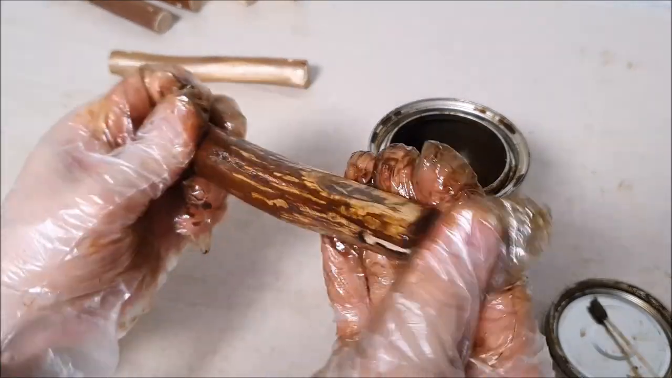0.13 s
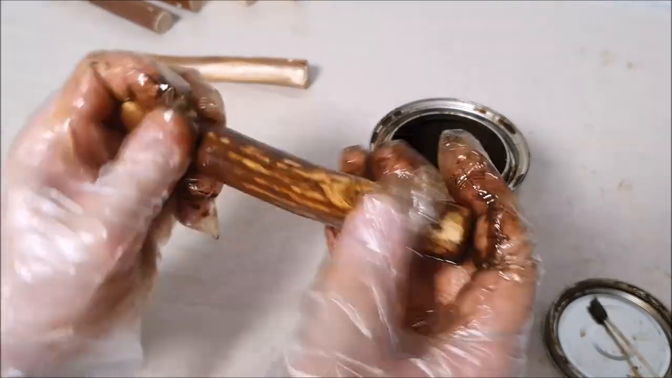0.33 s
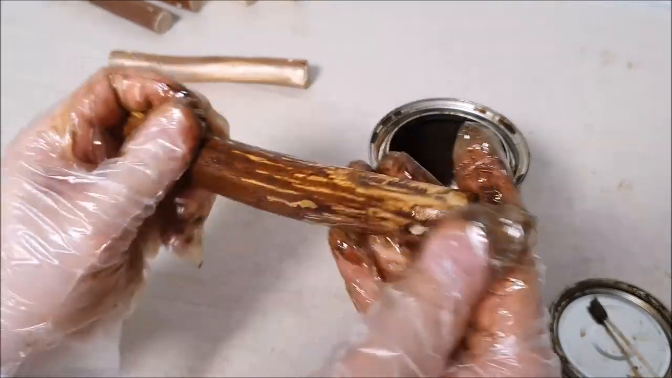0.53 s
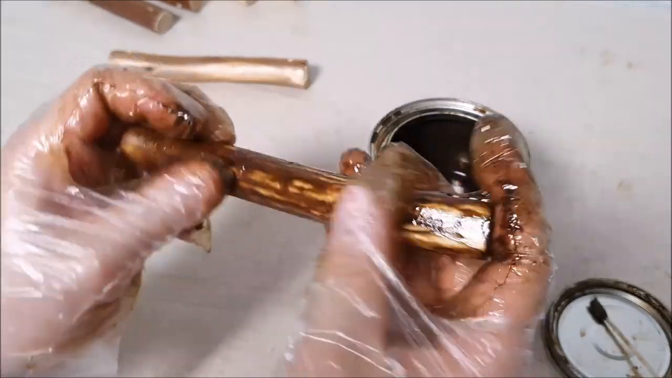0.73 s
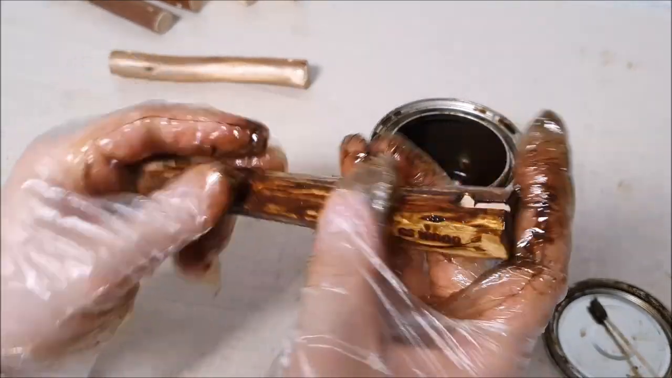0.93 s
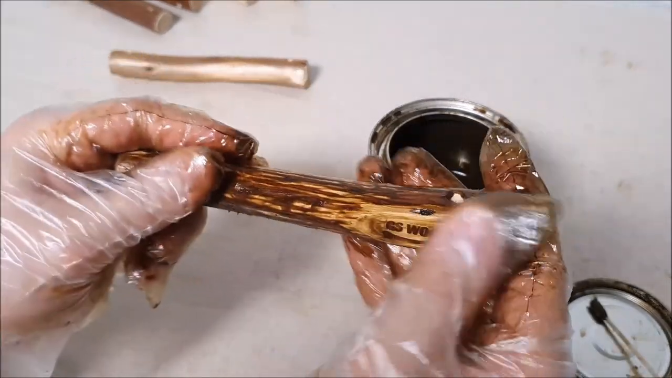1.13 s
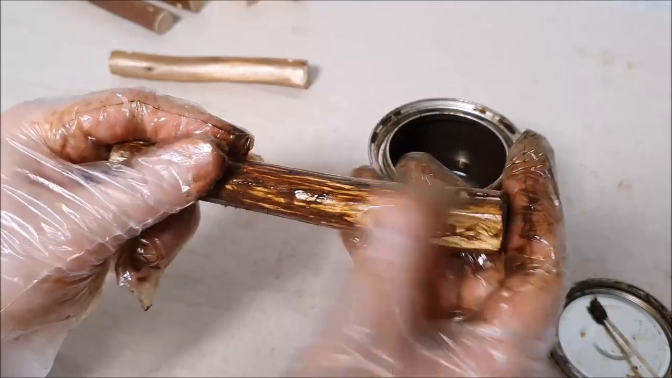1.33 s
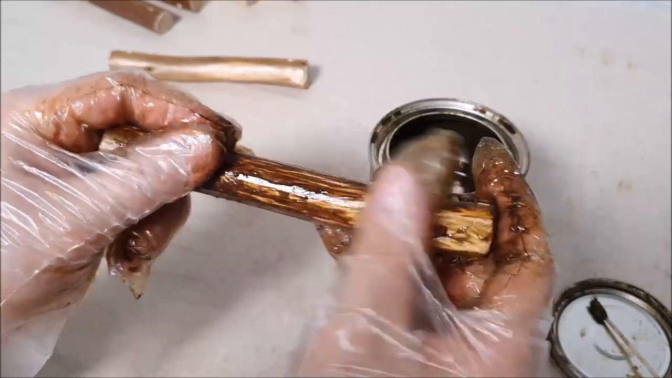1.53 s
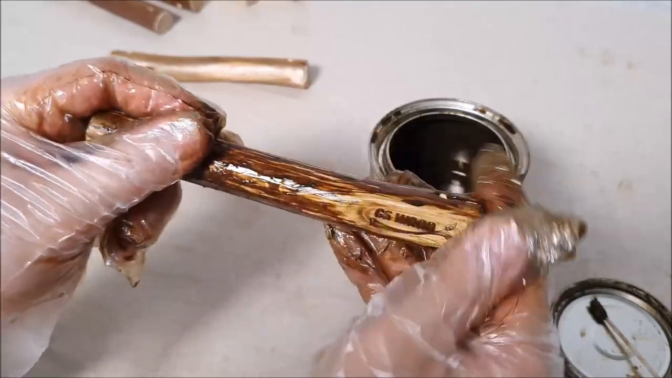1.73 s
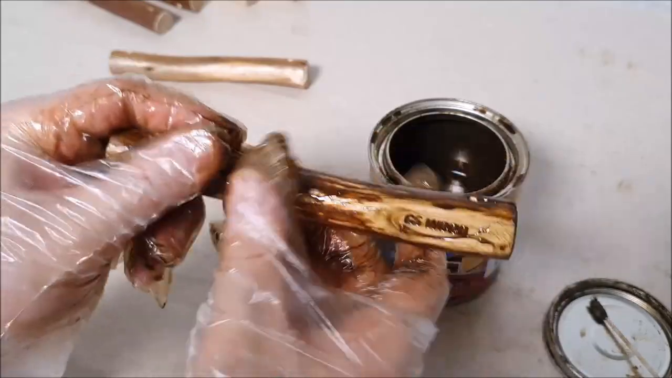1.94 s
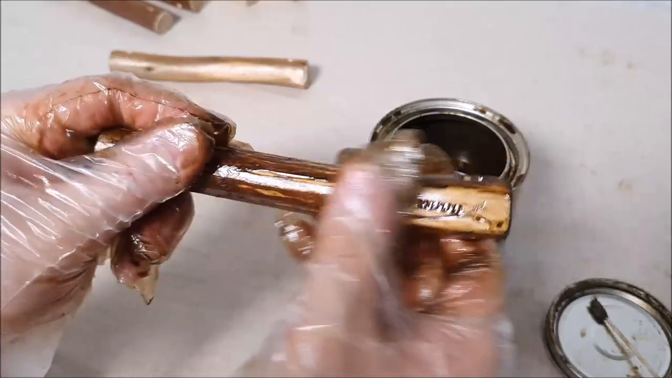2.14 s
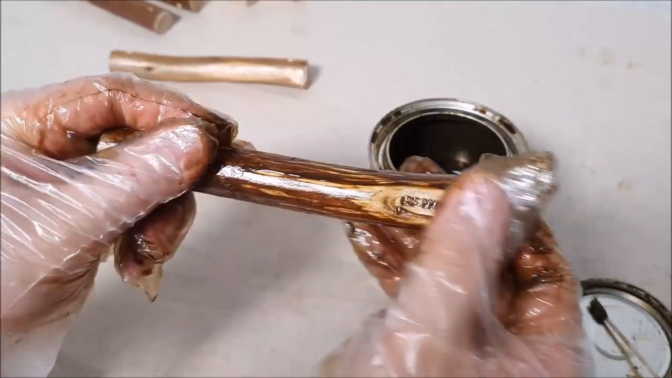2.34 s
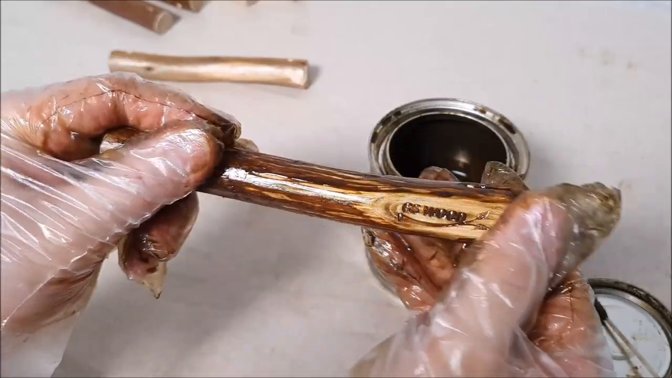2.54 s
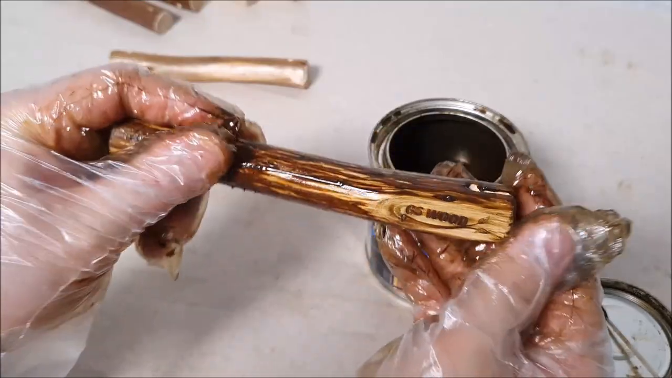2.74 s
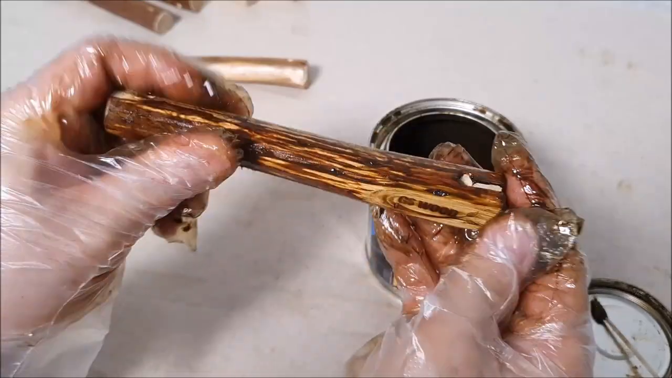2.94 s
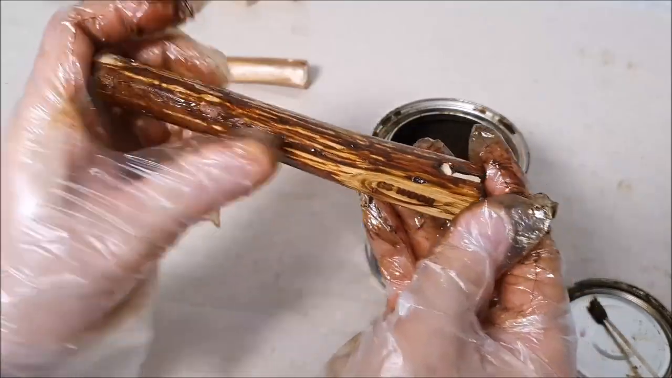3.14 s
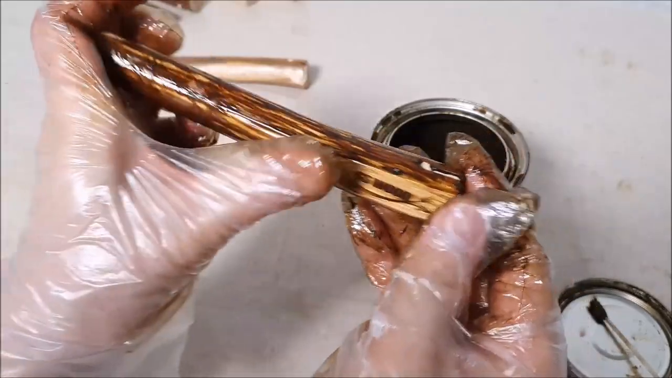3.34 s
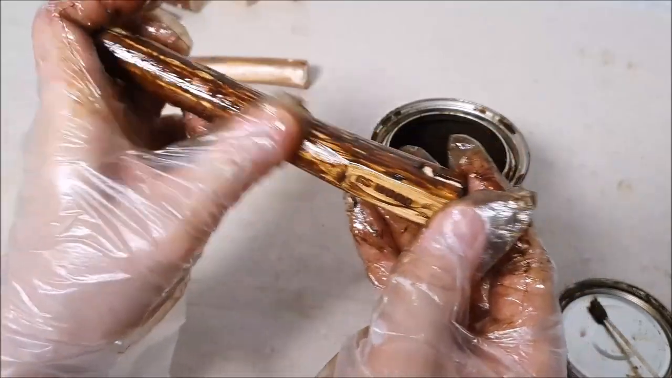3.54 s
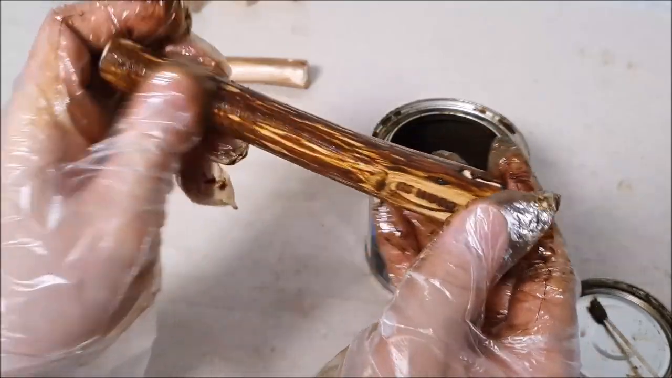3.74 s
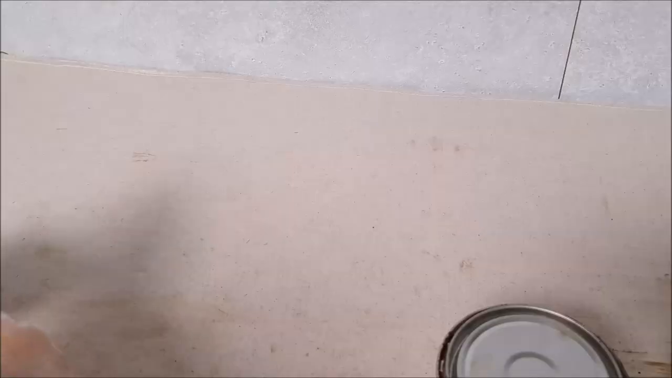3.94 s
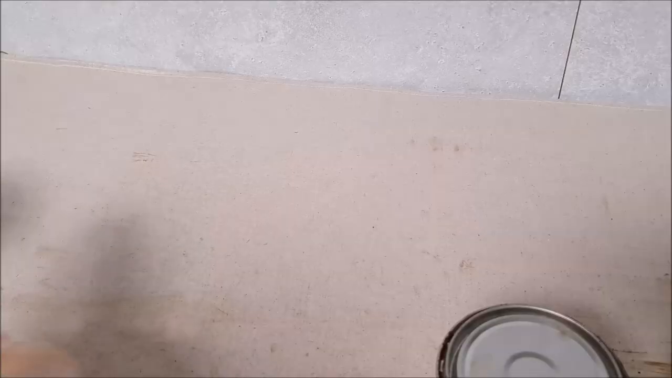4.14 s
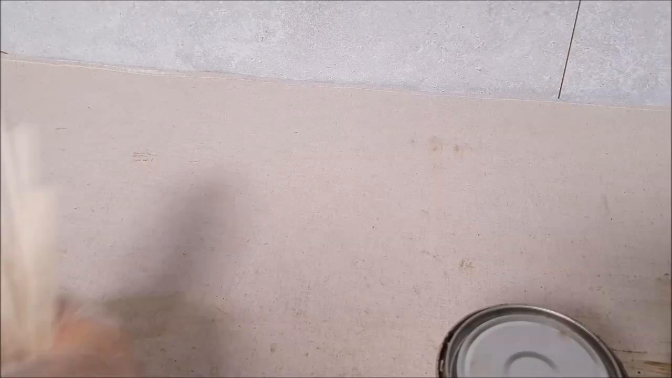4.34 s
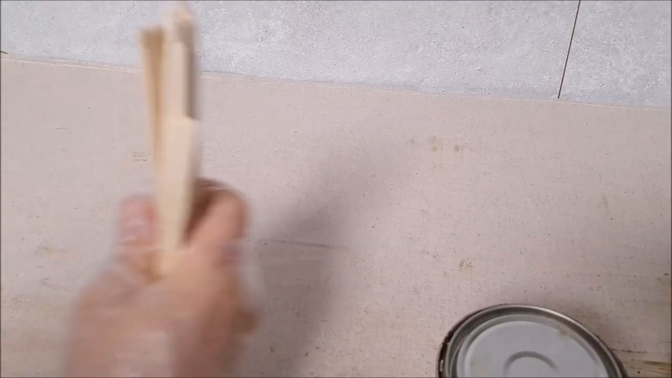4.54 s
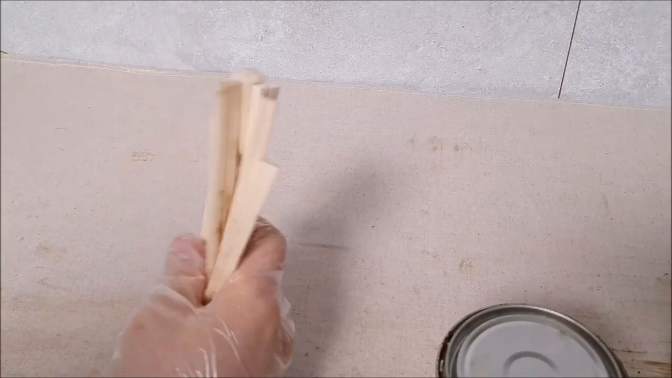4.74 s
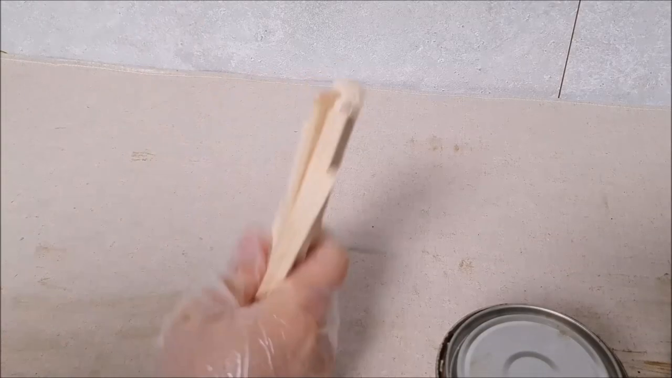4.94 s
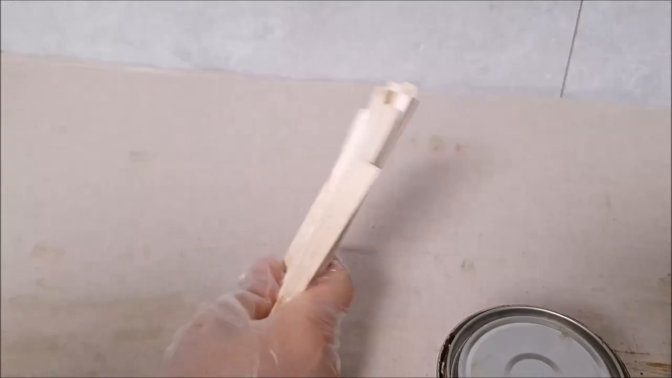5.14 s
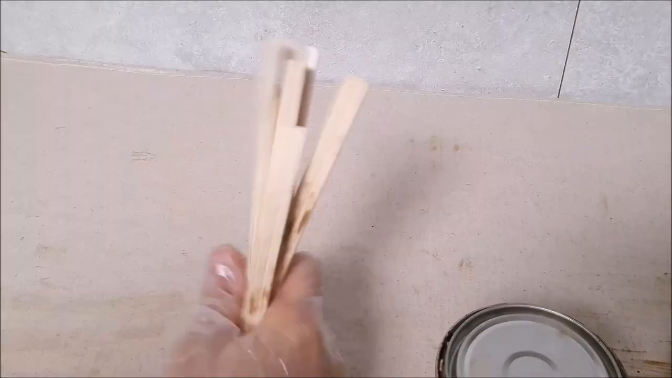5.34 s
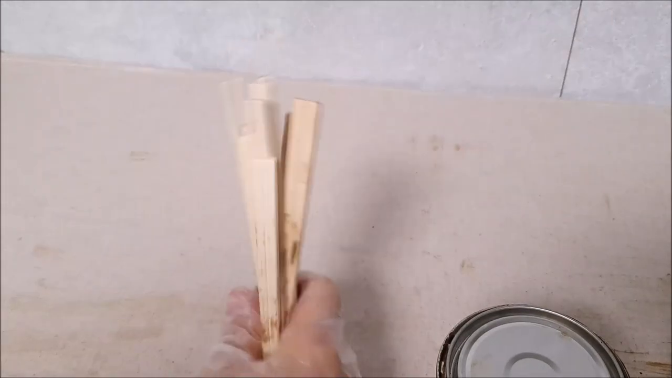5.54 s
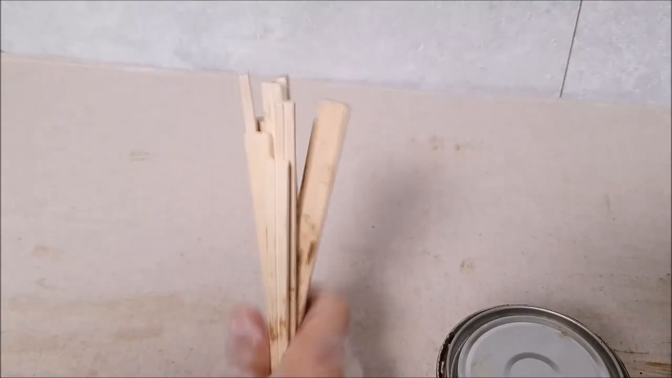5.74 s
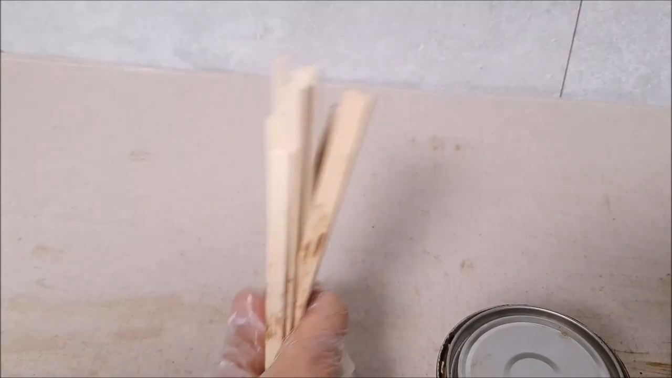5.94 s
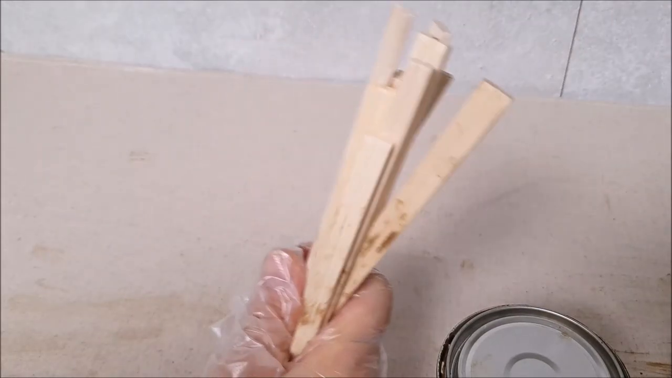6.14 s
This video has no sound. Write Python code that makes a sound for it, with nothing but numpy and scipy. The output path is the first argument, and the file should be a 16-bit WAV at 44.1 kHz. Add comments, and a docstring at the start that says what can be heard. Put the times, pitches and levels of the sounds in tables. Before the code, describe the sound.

Thin plastic gloves rub wet wood close to the microphone: short, uneven hissing strokes with fine crackle, strongest in the first two seconds. They grow quiet, then bright crease snaps and faint finger pops appear. After a split-second dropout, a fistful of loose sticks knocks the tabletop four times with dry woody clatter. Low hum and soft rumble sit beneath in a small room.

```python
"""Gloved hands rub stain along a wooden stick in a small workroom, over a low hum and soft rumble.
From the start thin plastic film hisses as it slides (banded noise) and its creases snap (noise bursts).
Around 3 s the rub passes from right glove to left, fingertips pop (rings) and the hand nudges the table.
At 4 s the sound drops out for an instant; from 4.7 s a fistful of sticks is knocked four times on the
table top (force pulses into ringing modes and clatter), with a second dropout before the third knock."""
import sys
import numpy as np
from scipy import signal
from scipy.fft import rfft, irfft, next_fast_len
from scipy.io import wavfile
from scipy.ndimage import uniform_filter1d

SR = 44100
rng = np.random.default_rng(int(sys.argv[2]) if len(sys.argv) > 2 else 0)


def output_pcm(signal):
    """Save a mono or channel-first signal as 16-bit PCM at the path in sys.argv[1].

    Samples are clipped to [-1, 1] before scaling.
    """
    pcm = np.clip(np.atleast_2d(signal).T, -1, 1) * 32767
    wavfile.write(sys.argv[1], SR, np.round(pcm).astype(np.int16))


N = 276948
TIME = np.arange(N) / SR
LEFT_RIGHT = np.array([[1], [-1]])


def amp(db):
    """Decibels to gain."""
    return 10 ** (np.asarray(db) / 20)


def rms_one(x):
    """Scale to unit power."""
    return x / np.sqrt(np.mean(x ** 2) + 1e-20)


def in_time(rows):
    """Interpolate each column of a time table, sample by sample."""
    s, *columns = np.transpose(rows)
    return [np.interp(TIME, s, column) for column in columns]


def at_hz(points, hz):
    """Interpolate a table on a log-frequency axis."""
    f, value = np.transpose(points)
    return np.interp(np.log(np.maximum(hz, 1)), np.log(f), value)


def cut(x, hz, kind, order=2):
    """Butterworth filter."""
    sos = signal.butter(order, np.clip(hz, 10, .45 * SR), kind, fs=SR, output="sos")
    return signal.sosfilt(sos, x + 1e-18)


def drift(rate_hz):
    """Smooth random curve, rms 1: white noise rolled off above rate_hz."""
    knots = np.arange(0, TIME[-1] + 1, 1 / 1000)
    hz = np.fft.rfftfreq(len(knots), knots[1])
    spectrum = rfft(rng.standard_normal(len(knots))) / (1 + (hz / rate_hz) ** 2)
    slow = irfft(spectrum, len(knots))
    return np.interp(TIME, knots, rms_one(slow))


# left-right correlation of noise: f/Hz, correlation
STEREO_LIKENESS = [(60, 0.43), (150, 0.41), (400, 0.356), (1000, 0.645), (2500, 0.074), (6000, 0.09),
                   (15000, .05)]


def noise(spectrum):
    """Coloured stereo noise, rms 1; mid and side weights set the left-right correlation per frequency."""
    size = next_fast_len(N, True)
    hz = np.fft.rfftfreq(size, 1 / SR)
    mid, side = rfft(rng.standard_normal((2, size))) * amp(at_hz(spectrum, hz))
    alike = np.clip(at_hz(STEREO_LIKENESS, hz), -1, 1)
    stereo = np.sqrt(1 + alike) * mid + np.sqrt(1 - alike) * side * LEFT_RIGHT
    return rms_one(irfft(stereo, size)[:, :N])


def ring(clicks, hz, t60_s):
    """Two-pole resonator: a unit click starts a decaying sine of height 1."""
    r, w = amp(-60 / (t60_s * SR)), 2 * np.pi * hz / SR
    return signal.lfilter([0, np.sin(w)], [1, -2 * r * np.cos(w), r * r], clicks + 1e-18)


def add(out, s, sound):
    """Mix a short sound in at time s."""
    start = int(np.clip(round(s * SR), 0, N - 1))
    out[..., start:start + sound.shape[-1]] += sound[..., :N - start]


def later(x, s):
    """One channel, delayed by s seconds."""
    return np.interp(TIME - s, TIME, x, left=0)


# hum level before trim: t/s, level/dB
HUM_CURVE = [(0.0, -62), (1.43, -62), (1.75, -70.5), (4.2, -71.5), (6.28, -74.5)]
# hum partials: f/Hz, relative level/dB
HUM_PARTIALS = [(76, -0.5), (152, -13), (228, -16.5)]


def hum(trim_db=6.5, waver_db=3.0, waver_hz=4.6, wander_turns=0.124, wander_hz=3.1):
    """Sum of low sines whose phases wander singly and whose level wavers together."""
    tone = 0
    for hz, db in HUM_PARTIALS:
        turns = hz * TIME + rng.random() + wander_turns * drift(wander_hz)
        tone = tone + amp(db) * np.sqrt(2) * np.sin(2 * np.pi * turns)
    return tone * amp(in_time(HUM_CURVE)[0] + trim_db + waver_db * drift(waver_hz))


# room and handling rumble before trim: t/s, level/dB
RUMBLE_CURVE = [(0, -60.5), (2.0, -60.5), (2.4, -69.5), (3.3, -63), (4.25, -61), (4.55, -68), (5.35, -63),
                (6.28, -67.5)]
# rumble spectrum: f/Hz, relative density/dB
RUMBLE_COLOUR = [(20, -23.5), (45, -6.5), (65, -6.5), (100, 0.5), (150, -6.5), (220, -5.5), (330, -18),
                 (700, -23.5), (2000, -26)]


def rumble(trim_db=1.5):
    """Low-weighted noise of room and handling, slowly changing in level."""
    return amp(in_time(RUMBLE_CURVE)[0] + trim_db) * noise(RUMBLE_COLOUR)


# room decay: f/Hz, t60/s
ROOM_DECAY = [(100, 0.38), (500, 0.285), (1500, 0.158), (5000, 0.066), (15000, 0.079)]


def room(x, build_s=0.00676, count=9):
    """Diffuse reflections build up and decay at a rate set per band; only the bass is alike on both sides."""
    t = TIME[:SR // 2]
    (mid, side), tail = rng.standard_normal((2, len(t))), 0
    edges_hz = np.geomspace(60, 18000, count + 1)
    for low, high in zip(edges_hz, edges_hz[1:]):
        hz = np.sqrt(low * high)
        white = mid + side * min(hz / 700, 1) * LEFT_RIGHT
        decay = amp(-60 * t / at_hz(ROOM_DECAY, hz))
        tail = tail + cut(white, [low, high], "band", order=1) * decay
    tail = tail * (1 - np.exp(-t / build_s))
    return signal.fftconvolve(x, tail / np.sqrt(np.sum(tail[0] ** 2)), axes=1)[:, :N]


# far-wall reflection: delay/s, level/dB, low-pass f/Hz
WALL = (.055, -14.5, 1150)


def wall_echo(x):
    """One far wall returns a delayed, dulled copy with the sides swapped."""
    delay_s, db, dull_hz = WALL
    swapped = np.array([later(side, delay_s) for side in x[::-1]])
    return amp(db) * cut(swapped, dull_hz, "low")


# hand against table: t/s, peak/dB, f/Hz, t60/s
HAND_NUDGE = (3, -45.5, 94.5, 0.02)


def nudge():
    """The hand nudges the table: one soft, low, decaying sine."""
    s, db, hz, t60_s = HAND_NUDGE
    return amp(db) * ring(signal.unit_impulse(N, int(s * SR)), hz, t60_s)


def push(s, db, hard_hz, spot_hz, spot_db, size=400):
    """Time and force of one contact: rounder when soft, boosted around the pitch of the spot it hits."""
    t = TIME[:size]
    force = t * np.exp(-2 * np.pi * abs(hard_hz) * t)
    spot = cut(force, [spot_hz * .8, spot_hz / .8], "band", order=1)
    force = force + (amp(spot_db) - 1) * spot
    return s, amp(db) * force / force.sum()


# bundle blows: t/s, strength/dB, hardness f/Hz, first gap between sticks/s, loss per stick/dB,
# lead of longest stick/s, its strength/dB, fist strength/dB, spot f/Hz, spot boost/dB
BUNDLE_KNOCKS = [(4.7368, -7.5, 2205, .0049, 4, .0215, -24, -33, 430, 4),
                 (5.0887, -17, 1550, .0060, 5, 0.01377, -32.5, -9.5, 900, 3.5),
                 (5.6161, -11.5, 1200, .0048, 6, .0165, -17.5, -14.5, 818, 5),
                 (5.8560, -8, 1197, .0047, 6, .0150, -19, -4, 624, 2.5)]
GAP_GROWTH = 1.32   # ratio of successive gaps between sticks
GLANCE_S, GLANCE_DB = .005, -9.5   # lead and relative strength of the glancing touch
CHATTER_S, CHATTER_LOSS_DB, CHATTER_HZ = .0045, 5, 1550   # spacing, loss per bounce, hardness
FIST_LAG_S, FIST_HZ = 0.0036, 118


def contacts(count=6):
    """Longest stick chatters, a touch glances, sticks land ever wider apart and weaker, the fist presses."""
    for s, db, hard_hz, gap_s, loss_db, lead_s, lead_db, fist_db, *spot in BUNDLE_KNOCKS:
        for k in range(count // 2):
            yield push(s - lead_s + k * CHATTER_S, lead_db - k * CHATTER_LOSS_DB, CHATTER_HZ, *spot)
        yield push(s - GLANCE_S, db + GLANCE_DB, hard_hz, *spot)
        for k in range(count):
            lag_s = gap_s * np.sum(GAP_GROWTH ** np.arange(k))
            yield push(s + lag_s, db - k * loss_db, hard_hz, *spot)
        yield push(s + FIST_LAG_S, fist_db, FIST_HZ, *spot)


# modes of the table top with sticks standing on it: f/Hz, relative level/dB, t60/s
TABLE_MODES = [(62.9, -26, 0.44), (108.1, -30.5, 0.38), (133.66, -22, 0.25), (169.4, -24.5, 0.12),
               (204.44, -25, 0.1935), (223.25, -24.5, 0.203), (409.1, -16.5, 0.077), (447.4, -11.5, 0.0572),
               (526.1, -19.5, 0.098), (614.6, -12, 0.0886), (681.7, -24, 0.12), (802, -23, 0.061),
               (853.7, -15, 0.077), (899, -22, 0.084), (987, -14.5, 0.029), (1085.2, -14, 0.055),
               (1240, -19.5, 0.048), (1431.6, -21, 0.15), (1602, -27, 0.052), (1798.7, -16, 0.051),
               (2121, -16, 0.042), (2210, -21, 0.061), (2600, -17, .05), (3086, -13.5, 0.022)]
# loose-stick clatter spectrum: f/Hz, relative density/dB
CLATTER_COLOUR = [(40, -44), (80, -18), (150, -8), (290, -19.5), (430, -7.5), (800, -1.5), (1150, -0.5),
                  (1550, -10.5), (2800, -13.5), (5000, -6.5), (12000, -38)]


def knocks(table_db=-3.0, clatter_db=-5.0, clatter_s=0.00984, width_db=1.0, radiate_hz=75):
    """Each contact excites the table modes and a damped noise burst of the loose bundle."""
    after, force, out = TIME[:SR // 10], np.zeros(N), np.zeros((2, N))
    clatter = noise(CLATTER_COLOUR)
    for k, (s, blow) in enumerate(contacts()):
        add(force, s, blow)
        shake = clatter[:, k * len(after):(k + 1) * len(after)] * np.exp(-after / clatter_s)
        add(out, s, amp(clatter_db) * signal.fftconvolve(shake, blow[None], axes=1))
    # contacts ms apart reinforce some modes and cancel others, so knocks ring differently
    for k, (hz, mode_db, t60_s) in enumerate(TABLE_MODES):
        sign = (-1) ** k
        lobes = amp(width_db * min(hz / 1000, 2) * sign * LEFT_RIGHT)   # uneven radiation
        out += sign * amp(mode_db + table_db) * lobes * ring(force, hz, t60_s)
    return cut(out, radiate_hz, "high")   # a board radiates little deep bass


def crease(hz, snap_s=0.00036, flutter_s=0.0024, flutter_db=-16, broad_db=-7, size=900):
    """One crease buckles: a crack around its pitch, then a short flutter of film; stereo, peak 1."""
    t = TIME[:size]
    decay = np.exp(-t / snap_s) + amp(flutter_db) * np.exp(-t / flutter_s)
    burst = rng.standard_normal((2, size)) * decay
    pitched = cut(burst, [hz / np.sqrt(2), hz * np.sqrt(2)], "band", order=1)
    crack = pitched + amp(broad_db) * cut(burst, 700, "high")
    return crack / np.abs(crack).max()


# larger creases before trim: t/s, peak/dB, f/Hz
LARGE_CREASES = [(0.8214, -20, 4730), (2.375, -35, 7440), (2.4248, -33, 8970), (2.56, -35.5, 6420),
                 (2.601, -32.5, 8680), (2.669, -30, 6600), (3.1524, -25.5, 8680), (3.3228, -20, 8800),
                 (3.4888, -22.5, 14900), (3.775, -21.5, 9300), (3.795, -21, 9290), (3.8427, -25.5, 14400),
                 (3.8524, -24, 7520), (4.03, -26.5, 7170), (4.0683, -32, 6230), (4.0795, -27, 5080),
                 (4.123, -33, 6430), (4.2855, -35.5, 12000), (4.3242, -28, 12200), (4.9946, -29, 13400),
                 (5.7895, -33.5, 5880), (6.1469, -35, 12200), (6.2348, -42, 11300)]


def snaps(trim_db=3.0):
    """Larger creases buckle singly, each with a slower crack and flutter."""
    out = np.zeros((2, N))
    for s, peak_db, hz in LARGE_CREASES:
        crack = crease(hz, snap_s=0.001185, flutter_s=0.0042, flutter_db=-20.5, broad_db=-16)
        add(out, s, amp(peak_db + trim_db) * crack)
    return out


# fingertips leaving wet wood: t/s, peak/dB, f/Hz
FINGER_POPS = [(3.1534, -40.5, 873), (3.3384, -39, 1120), (3.491, -42, 1176)]


def pops(t60_s=0.0193):
    """Fingertips pull off the wet wood: small hollow decaying sines."""
    out = np.zeros((2, N))
    for s, peak_db, hz in FINGER_POPS:
        add(out, s, amp(peak_db) * ring(signal.unit_impulse(SR // 20), hz, t60_s))
    return out


def crinkle(per_s, spread_db=2.5, clump_db=5.5, count=20):
    """Small creases of many pitches give way in clumps, a few much louder than the rest; rms 1."""
    sizes = amp(spread_db * np.minimum(rng.exponential(1, N), 3.5))
    born = rng.random(N) < per_s * amp(clump_db * drift(20)) / SR
    dealt = rng.integers(0, count, N)
    out = 0
    for k, hz in enumerate(np.geomspace(2800, 13000, count)):
        clicks = sizes * born * (dealt == k)
        out = out + signal.oaconvolve(clicks[None], crease(hz), axes=1)[:, :N]
    return rms_one(out)


def slips(per_s=70, fade_s=0.00506, size_db=-7.0):
    """Sticky film lets go at once and slows again: gain jumps at random and sinks back; rms 1."""
    jumps = (rng.random(N) < per_s / SR) * np.minimum(rng.exponential(1, N), 2.5)
    speed = signal.lfilter([1], [1, -np.exp(-1 / (fade_s * SR))], jumps + 1e-18)
    return rms_one(1 + amp(size_db) * speed)


# glove strokes and grip shifts: start t/s, length/s, level/dB, body relative to level/dB
GLOVE_STROKES = [(0.0, 0.0474, -39.5, -11.0), (0.117, 0.0104, -38.5, -11.5), (0.182, 0.0425, -37.5, -11.0),
                 (0.312, 0.0304, -40.5, -10.5), (0.41, 0.0325, -38.0, -9.5), (0.527, 0.1026, -40.5, -10.0),
                 (0.742, 0.011, -38.0, -9.0), (0.815, 0.0099, -34.0, -9.5), (0.866, 0.0396, -42.5, -7),
                 (0.96, 0.0836, -39.5, -10.0), (1.071, 0.1885, -43, -8.5), (1.322, 0.064, -48.5, -12.5),
                 (1.422, 0.0507, -38.0, -9.5), (1.536, 0.1634, -44.0, -9.5), (1.743, 0.09, -45.5, -13),
                 (1.887, 0.1022, -38, -9.5), (2.051, 0.098, -49.5, -8), (2.213, 0.0515, -52.5, -10.5),
                 (2.385, 0.3, -58.5, -10.0), (2.689, 0.094, -52.5, -10.5), (2.795, 0.133, -46.0, -8.5),
                 (3.017, 0.0856, -46, -13.5), (3.16, 0.2283, -42.5, -7.5), (3.485, 0.0091, -48.5, -7.0),
                 (3.572, 0.111, -49.0, -8.5), (3.707, 0.1393, -44, -11.0), (3.89, 0.1095, -47.5, -9),
                 (4.02, 0.1986, -54, -9), (4.331, 0.0486, -55, -11.5), (4.439, 0.0102, -50.0, -11),
                 (4.5, 0.0594, -45, -9.5), (4.657, 0.054, -53, -14), (4.746, 0.036, -44, 2.5),
                 (4.871, 0.0726, -48.5, -7), (5.106, 0.0664, -42.0, -7.5), (5.281, 0.1247, -46, -8.5),
                 (5.494, 0.0188, -44.0, -8.0), (5.608, 0.0835, -42.0, -5.5), (5.862, 0.1008, -42, -2.5),
                 (6.034, 0.0118, -42, -5)]
GRAB_S, RELEASE_S = 0.0286, 0.05004   # amplitude time constants before start, after end
REST_DB, REST_BODY_DB = -66, -18.5   # gloves held still; body relative to it


def effort(step=40):
    """Hiss and body gains: each stroke swells, holds and dies away; powers add."""
    t = TIME[::step]
    hiss, body = amp(REST_DB) ** 2, amp(REST_DB + REST_BODY_DB) ** 2
    for start, length, db, body_db in GLOVE_STROKES:
        before, after = np.maximum(start - t, 0), np.maximum(t - start - length, 0)
        power = (amp(db) * np.exp(-before / GRAB_S - after / RELEASE_S)) ** 2
        hiss, body = hiss + power, body + power * amp(body_db) ** 2
    return np.interp(TIME, t, np.sqrt(hiss)), np.interp(TIME, t, np.sqrt(body))


# sliding-film spectra, one per glove: f/Hz, relative density/dB
RIGHT_GLOVE = [(180, -25.5), (300, -7), (411, -11.5), (492, -5.5), (590, -9.5), (685, -5), (756, -6),
               (1000, -3), (1620, -6), (3570, -0.5), (4000, -1.5), (5210, 1.5), (10400, -2.5),
               (15500, -4.5)]
LEFT_GLOVE = [(180, -48.5), (300, -16), (431, -11.5), (744, -13), (835, -6), (1030, -5.5), (1120, -6),
              (1390, -3), (1700, -4), (2690, -3.5), (4000, -2.5), (4420, -2.5), (6150, 0), (8990, -2.5),
              (15500, -4.5)]
# passage from right glove to left: start t/s, end t/s
HANDOVER = (2.5, 3.06)


def film():
    """Friction noise, crossfaded at equal power from right glove to left."""
    turn = np.interp(TIME, HANDOVER, [0, np.pi / 2])
    return np.cos(turn) * noise(RIGHT_GLOVE) + np.sin(turn) * noise(LEFT_GLOVE)


# manner of the rub: t/s, crinkle relative to hiss/dB, treble boost before trim/dB, left minus right/dB
RUB_MANNER = [(0, -5, 3, 0.3), (2.0, -2.5, 4, 0.86), (2.5, 2, 7, 0), (2.85, -1, 3, 0),
              (3.25, -7.5, 4.5, 1.5), (3.8, 0, 8, 1), (4.25, -11, 5.5, 3), (4.55, -0.5, 5, 1.5),
              (5.15, -3.5, 5.5, 0.5), (5.9, -3.5, 4, 1), (6.28, 5, 6, 0.5)]


def gloves(slide_db=0.0, body_db=1.13, top_db=1.86, top_hz=9080, colour_db=2.0, uneven_db=1.1018,
           creases_per_s=300, firm_db=-42, body_hz=3000, count=9):
    """Film slides over wood, catching and letting go; a firmer rub is louder and folds more creases."""
    hiss_gain, body_gain = effort()
    crinkle_db, bright_db, _ = in_time(RUB_MANNER)
    # the film keeps changing shape, so each band swells and fades by itself
    edges_hz, friction = np.geomspace(200, 17000, count + 1), 0
    sliding = [film(), film()]   # neighbouring bands use different noise
    for k, band in enumerate(zip(edges_hz, edges_hz[1:])):
        friction = friction + cut(sliding[k % 2], band, "band") * amp(colour_db * drift(14.3))
    hiss = rms_one(cut(friction, body_hz, "high", order=3)) * amp(slide_db)
    body = rms_one(cut(friction, body_hz, "low", order=3)) * amp(body_db)
    catching = slips()
    rate = creases_per_s * (hiss_gain / amp(firm_db)) ** .15
    creases = amp(crinkle_db) * crinkle(rate)
    treble = (hiss * catching + creases) / np.sqrt(1 + amp(crinkle_db) ** 2)
    treble = treble + (amp(bright_db + top_db) - 1) * cut(treble, top_hz, "high", order=1)
    rub = hiss_gain * treble + body_gain * body * catching
    return amp(uneven_db * drift(16)) * rub


def scene(knock_pan_db=1.4, glove_room_db=-14, knock_room_db=-15):
    """Gloves and table, mostly a little to the left, with reflections over the background."""
    sides = LEFT_RIGHT / 2
    hands, wood = gloves() + snaps() + pops(), knocks()
    hands = np.array([hands[0], later(hands[1], 2 / SR)])   # reaches the left side first
    direct = hands * amp(in_time(RUB_MANNER)[2] * sides) + wood * amp(knock_pan_db * sides)
    reflected = amp(glove_room_db) * room(hands) + amp(knock_room_db) * room(wood)
    return direct + wall_echo(wood) + reflected + nudge() + hum() + rumble()


# brief level dips before smoothing: start t/s, end t/s, depth/dB
LEVEL_DIPS = [(3.994, 4.018, -22), (5.464, 5.485, -33.5)]
CUTOFF_HZ = 16050


def record(dry):
    """Level drops out briefly twice; a steep low-pass removes the top."""
    dip_db = sum(depth_db * ((TIME > start) & (TIME < end)) for start, end, depth_db in LEVEL_DIPS)
    heard = dry * amp(uniform_filter1d(dip_db * 1.0, size=180))   # edges about 4 ms long
    return signal.sosfilt(signal.ellip(12, .1, 80, CUTOFF_HZ, fs=SR, output="sos"), heard)


dry = scene()
out = record(dry)
output_pcm(out)
```